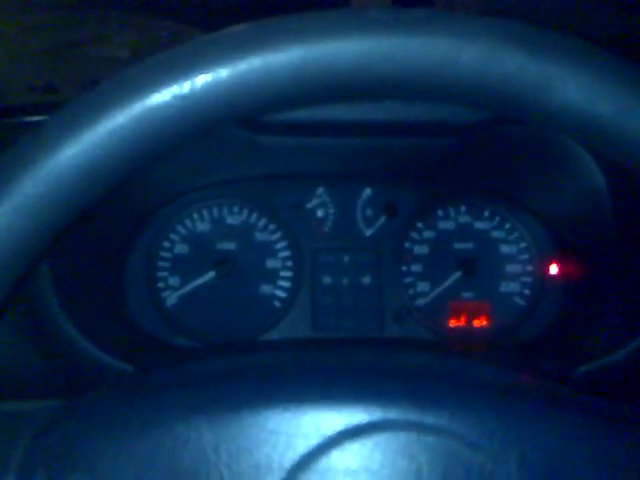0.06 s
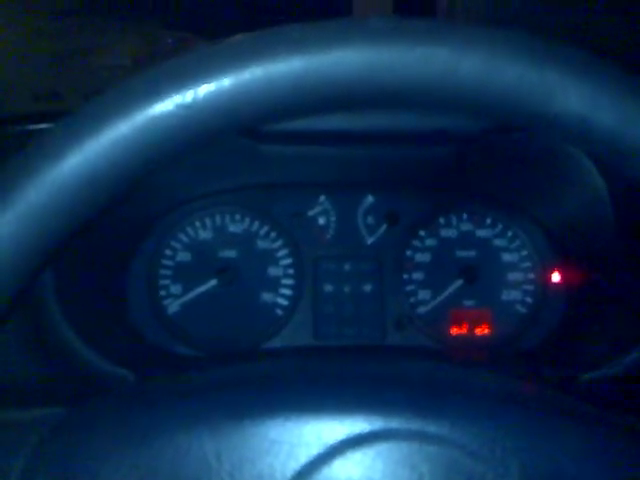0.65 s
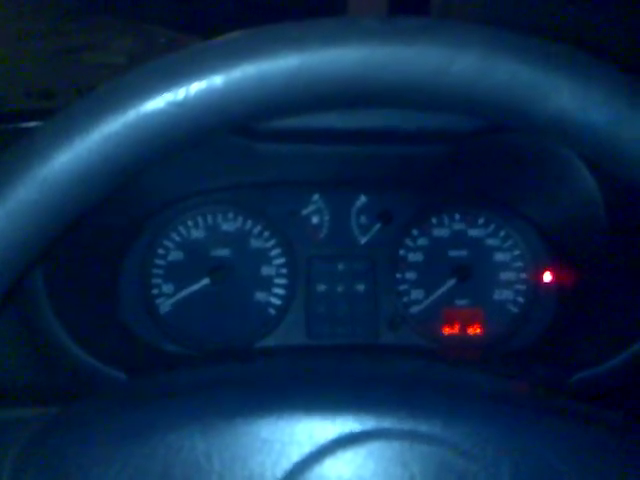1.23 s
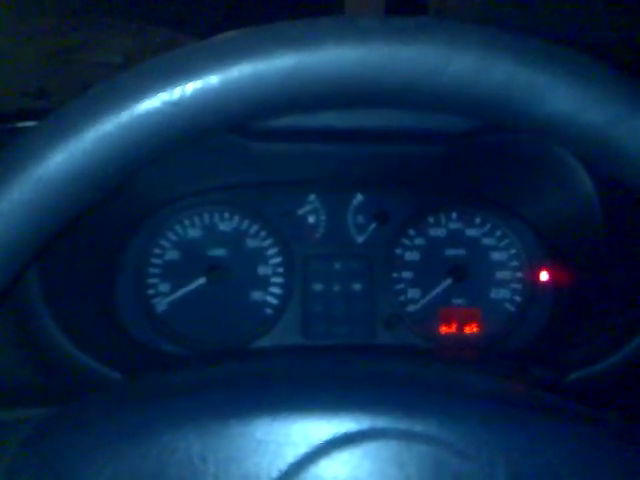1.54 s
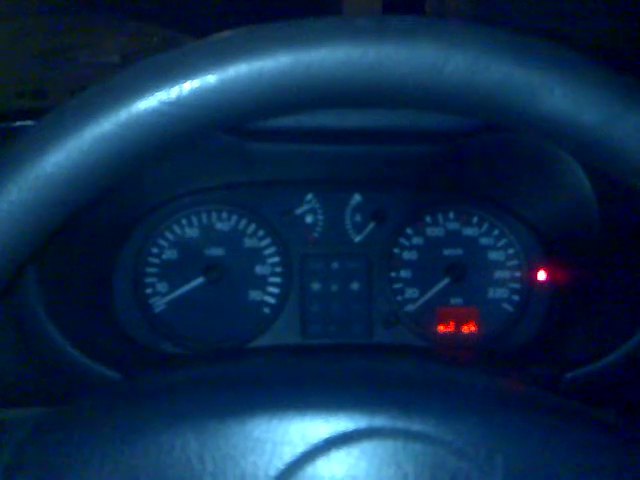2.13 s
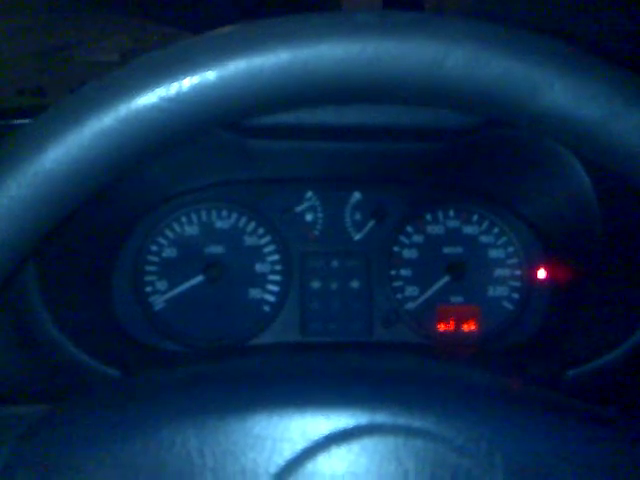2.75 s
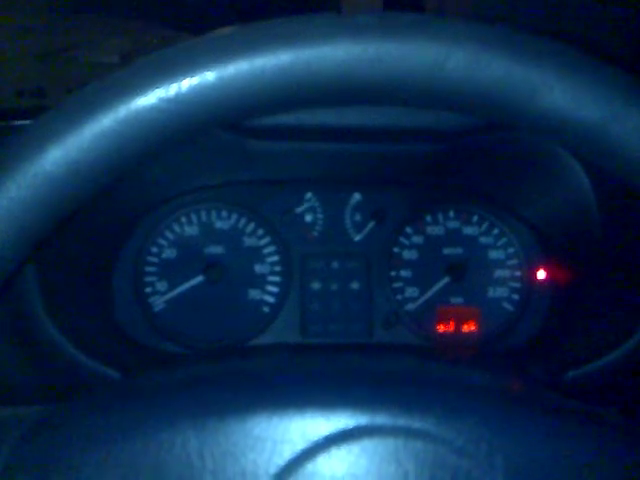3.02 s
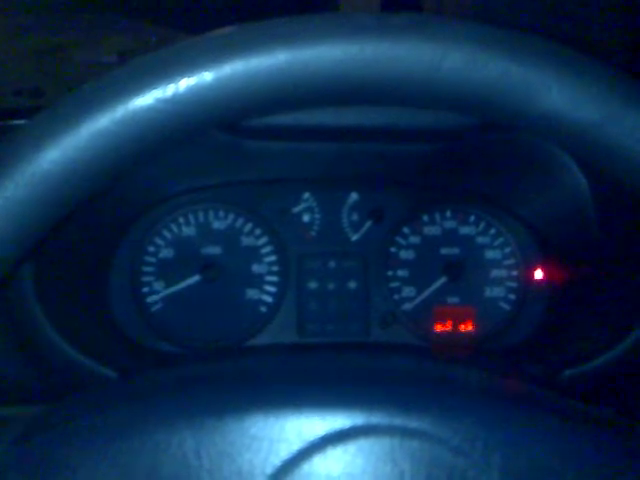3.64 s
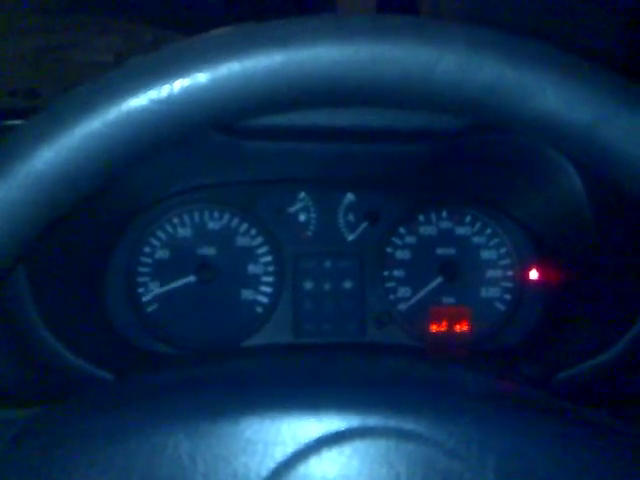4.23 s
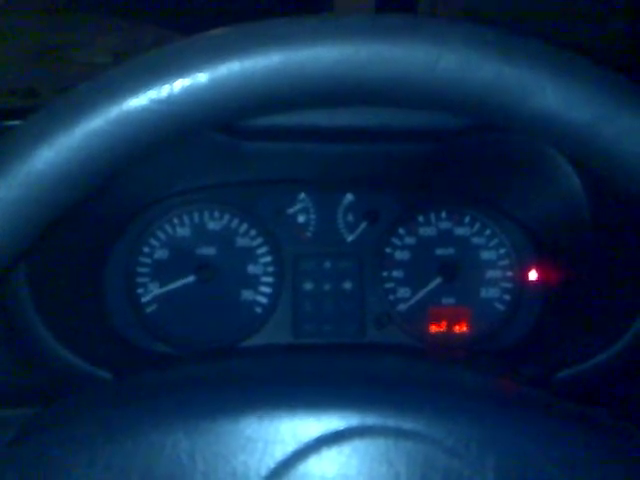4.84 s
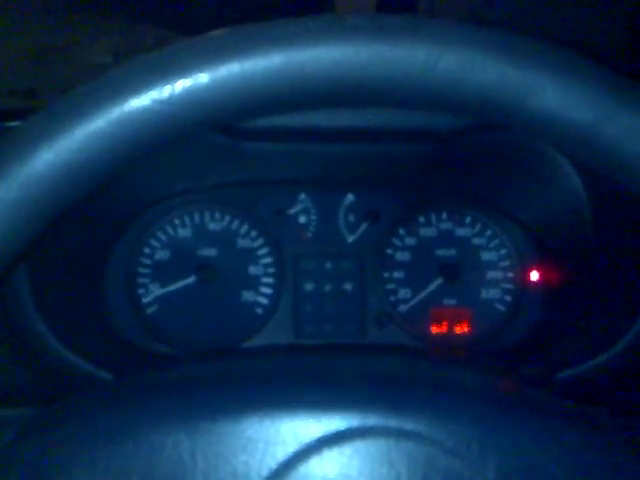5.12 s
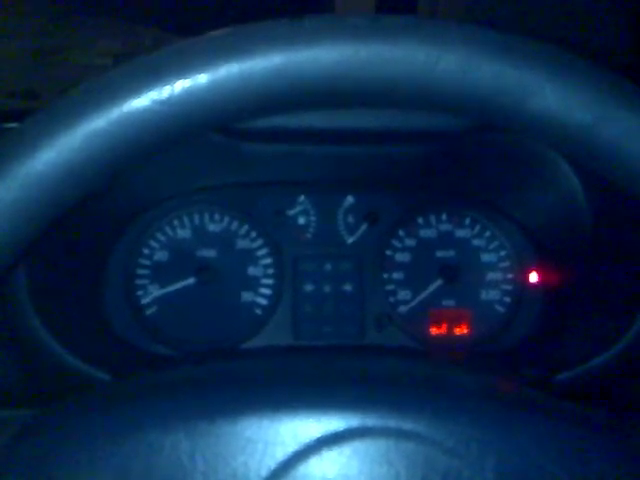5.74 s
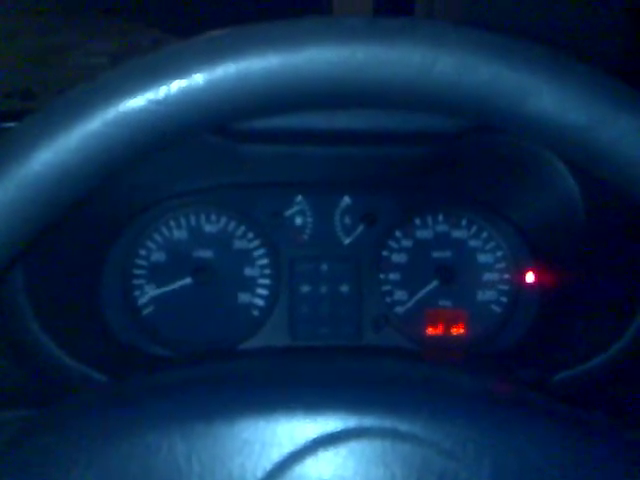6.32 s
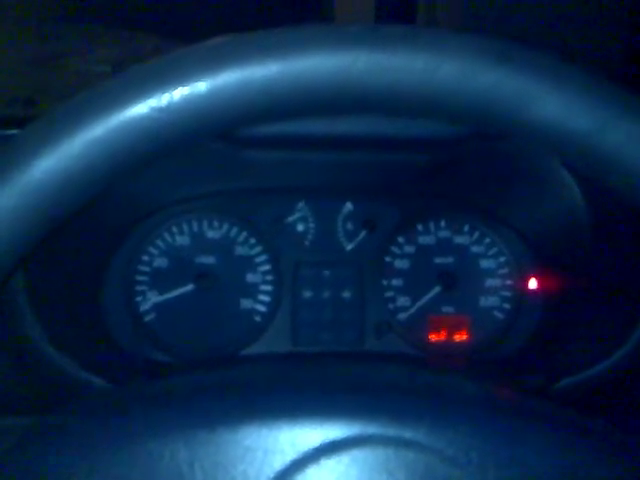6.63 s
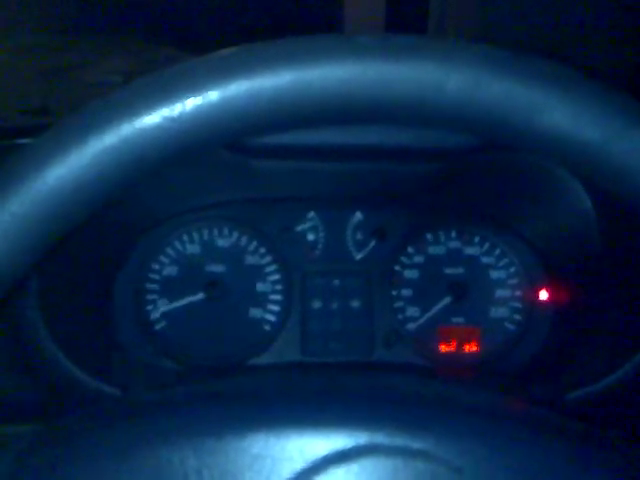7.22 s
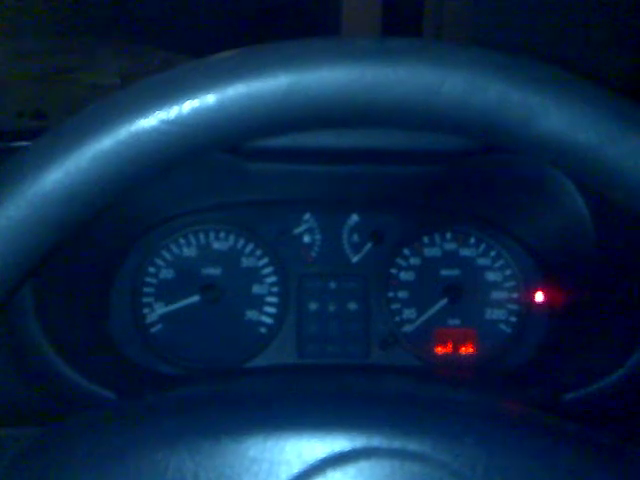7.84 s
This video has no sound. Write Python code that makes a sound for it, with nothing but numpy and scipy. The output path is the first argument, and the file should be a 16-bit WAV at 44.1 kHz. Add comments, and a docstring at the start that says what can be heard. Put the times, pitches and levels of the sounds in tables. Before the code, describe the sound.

Heard from the driver's seat of a closed car, a small cold diesel engine labours at very low speed with heavy, uneven thumps and muffled knocking. After about three seconds it picks up, wavers, and settles into a quieter, smoother idle that booms in the cabin, with faint valve ticking underneath. Near the end, a piece of plastic close to the microphone gives three quick, sharp clicks while the engine keeps running.

```python
"""Driver's seat of a closed car, just after the cold start of its small four-cylinder diesel.
The engine labours at very low speed, each firing a thump in the cabin, then picks up, hunts and settles
into an idle that booms in the cabin air. Combustion knock, piston slap and valve clatter come dully
through the bulkhead. Near the end some plastic close by clicks three times."""
import sys
import numpy as np
from scipy import signal
from scipy.fft import rfft, irfft, next_fast_len
from scipy.io import wavfile
from scipy.ndimage import uniform_filter1d

SR = 44100
rng = np.random.default_rng(int(sys.argv[2]) if len(sys.argv) > 2 else 0)


def transcribe(u):
    """Save the signal u as a 16-bit wav file named by the first command-line argument.

    u: samples, shape (n,) or (channels, n), limited to [-1, 1]; the rate is SR.
    q: integer samples, one column per channel.
    """
    v = np.clip(np.atleast_2d(u).T, -1, 1)
    q = np.round(v * 32767).astype(np.int16)
    wavfile.write(sys.argv[1], SR, q)


N = 355887
TIME = np.arange(N) / SR
FREQ = np.fft.rfftfreq(2 * next_fast_len(N // 2 + SR // 8), 1 / SR) + 1e-3
FIRINGS_PER_CYCLE = 4


def undb(db):
    """Decibels to gain."""
    return 10 ** (np.asarray(db) / 20)


def unit(x):
    """Scale to rms 1."""
    return x / np.sqrt(np.mean(x ** 2))


def noise():
    """White noise."""
    return rng.standard_normal(N)


def through(x, response):
    """Filter by a frequency response."""
    return irfft(rfft(x, 2 * len(FREQ) - 2) * response)[:N]


def resonance(hz, width_hz):
    """Response of one damped resonance, 1 at its centre."""
    return 1 / (1 + 1j * (FREQ ** 2 - hz ** 2) / (FREQ * width_hz))


def swept(drive_hz, hz, width_hz):
    """Response of a resonance to a moving drive frequency, 1 at its centre."""
    return 1 / (1 + 2j * (drive_hz - hz) / width_hz)


def modes(table):
    """Response of a body with several resonances."""
    return sum(undb(db) * resonance(hz, width_hz) for hz, width_hz, db in table)


def colour(points):
    """Minimum-phase response with the given (Hz, dB) outline."""
    hz, db = np.transpose(points)
    gain = undb(np.interp(np.log(FREQ), np.log(hz), db))
    cepstrum = irfft(np.log(gain))
    cepstrum[1:len(FREQ) - 1] *= 2
    cepstrum[len(FREQ):] = 0
    return np.exp(rfft(cepstrum))


def pulses(times_s, sizes):
    """One impulse at each time."""
    at = np.round(np.asarray(times_s) * SR).astype(int)
    inside = (at >= 0) & (at < N)
    return np.bincount(at[inside], np.asarray(sizes)[inside], N)


def fading(blows, decay_s):
    """Envelope that jumps at each blow and dies away."""
    return signal.lfilter([1], [1, -np.exp(-1 / (decay_s * SR))], blows)


def settling(labouring_db, idle_db, halfway_s, easing_s):
    """Level in dB, easing from labouring to idle."""
    return idle_db + (labouring_db - idle_db) / (1 + np.exp((TIME - halfway_s) / easing_s))


def swell(centre_s, half_length_s, db):
    """Bell-shaped level change in dB."""
    return db * np.exp(-((TIME - centre_s) / half_length_s) ** 2)


# Engine speed. Each row: time in seconds, firing rate in Hz.
ENGINE_SPEED = [(0.0, 18.11), (0.48, 18.55), (1.61, 18.79), (2.75, 19.29), (3.34, 21.15), (3.97, 26.9),
                (4.28, 26.68), (4.67, 24.01), (5.11, 26.27), (5.6, 25.89), (6.28, 26.07), (6.85, 25.79),
                (7.4, 26.87), (8.07, 25.47)]
# One strain before the pick-up, two light spells after it.
# Each row: centre in seconds, half-length in seconds, level change in dB.
LOAD_SWELLS = [(2.334, 0.17, 2), (4.619, 0.21, -1), (7.398, .25, -3.5)]


def crankshaft():
    """Crank angle counted in firings, firing rate and load."""
    rate_hz = np.interp(TIME, *np.transpose(ENGINE_SPEED))
    crank = np.cumsum(rate_hz) / SR - .42
    load_db = sum(swell(*change) for change in LOAD_SWELLS)
    return crank, rate_hz, load_db


# Cylinders in firing order. Each row: knock, valve tick, thud, panel shudder, injector and tappet
# strength, all in relative dB.
CYLINDER_STRENGTHS = [(0, -3, -7, -8, 0.5, -2), (-1, -4, -3, 4.5, 5, -10), (-2, -2.5, -4, -14, -5, 4),
                      (2.5, 2.5, -5, -8.5, -1, -4)]
KNOCK_DB, VALVE_DB, THUD_DB, SHUDDER_DB, INJECTOR_DB, TAPPET_DB = np.transpose(CYLINDER_STRENGTHS)


def strokes(crank, lag, cylinder_db, scatter_db, jitter_s):
    """One impulse per firing, offset by lag firings; strength is common or per cylinder."""
    firing = np.arange(-1, int(crank[-1]) + 1)
    late, harder = rng.standard_normal((len(firing), 2)).T
    times_s = np.interp(firing + lag, crank, TIME, left=-1, right=-1) + jitter_s * late
    strength_db = np.broadcast_to(cylinder_db, FIRINGS_PER_CYCLE)[firing % FIRINGS_PER_CYCLE]
    return pulses(times_s, undb(strength_db + scatter_db * harder))


def fizz(crank, thump_db, trim_db=-62.5):
    """A faint, dull fizz rides on the crest of each thump."""
    crests = strokes(crank, lag=.4, cylinder_db=0, scatter_db=2, jitter_s=.001)
    bursts = noise() * fading(crests, decay_s=.008)
    return unit(through(bursts, resonance(hz=2600, width_hz=2200) ** 3)) * undb(thump_db + trim_db)


def injectors(crank, level_db=-90.8):
    """Injectors tick on opening and closing, whatever the load; one is louder than the rest."""
    opening = strokes(crank, lag=.08, cylinder_db=INJECTOR_DB, scatter_db=1.5, jitter_s=.0006)
    closing = strokes(crank, lag=.28, cylinder_db=-3, scatter_db=3, jitter_s=.001)
    bursts = noise() * (.28 + fading(opening + closing, decay_s=.004))
    return unit(through(bursts, resonance(hz=1950, width_hz=600) ** 4)) * undb(level_db)


def tappets(crank, knock_over_idle_db, idle_db=-86):
    """Tappets tap; a loose one clacks every four firings, a little harder under load."""
    taps = strokes(crank, lag=-.01, cylinder_db=TAPPET_DB, scatter_db=1, jitter_s=.0005)
    bursts = noise() * fading(taps, decay_s=.007)
    level_db = idle_db + .4 * knock_over_idle_db
    return unit(through(bursts, resonance(hz=1240, width_hz=700) ** 4)) * undb(level_db)


# Contacts, a few per click. Each row: start in seconds, relative level in dB, centre in Hz, width in Hz.
PLASTIC_CONTACTS = [(6.9209, 4, 294, 1100), (6.9207, 0, 1000, 970), (6.9208, 4, 1500, 800),
                    (6.9206, -6, 3560, 1100), (6.9209, -17, 5000, 4400), (6.9335, -20, 800, 1100),
                    (6.9721, -15.5, 5190, 2700), (6.9720, -18, 2100, 1600), (6.9707, -10, 360, 430),
                    (6.9969, -1, 2020, 1400), (6.9972, -8, 5000, 4900), (6.9962, -4, 470, 450),
                    (7.0658, -4, 2940, 2430), (7.0660, -8, 9700, 6000), (7.0652, -15, 580, 2600)]
# Plastic resonances. Each row: centre in Hz, width in Hz, gain in dB.
PLASTIC_MODES = [(390, 504, 8.5), (635, 60, -1), (965, 69, -6), (1084, 348, -11), (1600, 163, -4.5),
                 (2256, 276, -9.5), (3050, 330, -7.5), (3468, 220, -10), (5000, 900, -14), (6850, 260, -8),
                 (9070, 670, -16)]


def plastic_clicks(travel_at_1khz_s=.0015, scrape_db=-49, tail_db=-48, tail_decay_s=.014):
    """Plastic snaps, slips and snaps again; its bending waves bring treble first, bass last."""
    blows = sum(through(pulses([start_s], [undb(db)]), resonance(hz, width_hz) ** 4)
                for start_s, db, hz, width_hz in PLASTIC_CONTACTS)
    slip_times_s = [6.92, 6.925, 6.969, 6.974, 6.988, 6.996, 7.001, 7.02]
    slipping = np.interp(TIME, slip_times_s, [0, .25, .2, .9, .6, 1.4, .2, 0])
    catches = noise() * rng.exponential(size=N) ** 2 / 5
    scrape = through(catches * slipping, resonance(hz=5200, width_hz=6000) ** 2)
    bending = np.exp(-4j * np.pi * travel_at_1khz_s * np.sqrt(1000 * FREQ))
    direct = through(blows + undb(scrape_db) * scrape, modes(PLASTIC_MODES) * bending)
    # upholstery leaves only a short, faint tail
    tail_s = TIME[:SR // 10]
    tail = uniform_filter1d(noise()[:len(tail_s)], size=5) * np.exp(-tail_s / tail_decay_s)
    return direct + undb(tail_db) * signal.fftconvolve(direct, tail)[:N]


# Knock spectrum through the bulkhead. Each row: frequency in Hz, relative density in dB.
KNOCK_SPECTRUM = [(400, -15), (830, -15.5), (880, 4.5), (980, 3.5), (1050, -8.5), (1130, -12.5),
                  (1300, -11.5), (1500, -18), (1750, -22), (2050, -33), (2300, -40.5), (3200, -49.5),
                  (6000, -58.5), (9000, -66)]


def diesel_knock(crank, knock_db, clatter_db=-2.5, ring_db=-5):
    """A knock at each ignition, then a valve tick: each a short ring of the block in a burst of clatter."""
    ignitions = strokes(crank, lag=-.08, cylinder_db=KNOCK_DB, scatter_db=1.2, jitter_s=.0007)
    valves = strokes(crank, lag=.22, cylinder_db=VALVE_DB - 1, scatter_db=1.9, jitter_s=.0014)
    blows = ignitions + valves * undb(settling(0, -8.5, halfway_s=3.3, easing_s=.7))
    # mounts and bulkhead round each onset
    envelope = uniform_filter1d(.24 + fading(blows, decay_s=.0065), size=90)
    clatter = unit(through(noise() * envelope, colour(KNOCK_SPECTRUM)))
    ring = unit(through(blows, resonance(hz=955, width_hz=130) ** 2))
    return (undb(clatter_db) * clatter + undb(ring_db) * ring) * undb(knock_db)


# Hard firings. Each row: time in seconds, relative level in dB, decay in seconds, relative edge in dB.
HARD_FIRINGS = [(0.041, -56, .004, -6), (0.181, -54.5, 0.0033, -18.5), (0.200, -58, .004, -13.5),
                (0.293, -54, .005, -19), (0.351, -52.5, 0.0088, -3), (0.372, -57, 0.0048, -4),
                (0.401, -51, 0.0072, -6.5), (0.416, -54, 0.012, -8), (0.458, -57.5, 0.0047, 1),
                (0.568, -56.5, .006, -0.5), (0.617, -57.5, 0.0034, -9), (0.78, -54.5, .005, -2),
                (0.832, -57.5, .005, -9.5), (0.94, -56, .004, -16), (0.997, -53, .005, -3),
                (1.014, -58, 0.0044, -4), (1.209, -52, 0.0074, -3), (1.229, -52.5, .007, -6),
                (1.260, -55.5, 0.0044, -11.5), (1.441, -57, 0.0034, -8), (1.472, -54.5, .005, -8.5),
                (1.582, -54.5, .004, -20), (1.743, -57, 0.0074, -1), (1.794, -57.5, .005, -5.5),
                (1.896, -52.5, .006, -14), (1.920, -53, 0.0047, -9.5), (1.956, -50.5, 0.0087, -2),
                (1.975, -57, 0.014, -4), (2.109, -53.5, 0.0044, -10), (2.169, -57.5, .004, -9),
                (2.318, -47, .008, -13.5), (2.336, -49, .010, -8.5), (2.376, -53, .010, -2),
                (2.687, -55, .005, -0.5), (2.855, -59.5, 0.0039, -7), (3.037, -51.5, 0.0054, -16),
                (3.136, -51, .005, -5), (3.154, -53.5, 0.0054, -8), (3.195, -56, 0.0053, -21),
                (3.297, -61, 0.0042, -7), (3.329, -58, 0.0047, -3), (3.394, -62, .004, -8),
                (3.472, -62, 0.0045, -2), (3.684, -57.5, .007, -7), (3.963, -61, 0.0076, -2.5),
                (4.106, -58.5, .005, -7), (4.141, -55.5, 0.0049, -9), (4.739, -59, 0.0043, -8),
                (5.240, -62.5, .005, -23), (5.316, -60, .006, -20)]


def hard_knocks(trim_db=-1, bright_db=-9, lead_s=.001):
    """A cold cylinder sometimes fires harder: a crisp clack, often doubled, some with a metallic edge."""
    dull = bright = clacks = 0
    for time_s, db, decay_s, edge_db in HARD_FIRINGS:
        burst = fading(pulses([time_s - lead_s], [undb(db)]), decay_s)
        dull += burst
        bright += burst * undb(edge_db + bright_db)
    metallic = resonance(hz=1330, width_hz=750) ** 4
    for envelope, path in [(dull, colour(KNOCK_SPECTRUM)), (bright, metallic)]:
        path_rms = np.sqrt(np.mean(abs(path) ** 2))
        clacks += through(noise() * uniform_filter1d(envelope, size=70), path / path_rms)
    return undb(trim_db) * clacks


# Slaps in one four-stroke cycle. Each row: position in firings, relative level in dB, ring in Hz.
PISTON_SLAPS = [(.04, -5.5, 561), (1.3, -1, 570), (1.52, -1.5, 430), (2.33, -1, 560), (2.98, 0, 440)]


def piston_slap(crank, block_db, trim_db=-7, jitter_s=.0007, scatter_db=1.2):
    """Cold pistons slap at set points of the cycle, each ringing the block with its own hollow note."""
    cycle_starts = FIRINGS_PER_CYCLE * np.arange(crank[-1] // FIRINGS_PER_CYCLE + 1)
    block_band = resonance(hz=520, width_hz=430) ** 4
    ring = 0
    for position, db, hz in PISTON_SLAPS:
        late, harder = rng.standard_normal((len(cycle_starts), 2)).T
        times_s = np.interp(cycle_starts + position, crank, TIME, left=-1, right=-1) + jitter_s * late
        slaps = pulses(times_s, undb(db + scatter_db * harder))
        ring += through(slaps, resonance(hz, width_hz=130) * block_band)
    return unit(ring) * undb(block_db + trim_db)


# Dashboard panel resonances. Each row: centre in Hz, width in Hz, gain in dB.
PANEL_MODES = [(233, 18, 7.5), (266, 47, -1)]


def panel_shudder(crank, block_db, trim_db=-26.3):
    """One cylinder shakes a panel hardest, and it rebounds: a loose throb every four firings."""
    blows = strokes(crank, lag=.2, cylinder_db=SHUDDER_DB, scatter_db=2, jitter_s=.0005)
    rebounds = strokes(crank, lag=.78, cylinder_db=SHUDDER_DB - 5, scatter_db=2.5, jitter_s=.002)
    panel = modes(PANEL_MODES) * resonance(hz=238, width_hz=100) ** 2
    return unit(through(blows + rebounds, panel)) * undb(.5 * block_db + trim_db)


# Block spectrum through the bulkhead. Each row: frequency in Hz, relative density in dB.
BLOCK_SPECTRUM = [(40, 6), (70, 14.5), (120, 14.5), (200, 3.5), (300, 0.5), (400, 0), (470, -0.5),
                  (510, -4), (560, 0.5), (620, -6.5), (700, -9), (810, -18.5), (1100, -29.5), (2200, -61.5)]


def block_rumble(crank, block_db, trim_db=10):
    """The block thuds after each ignition over a churn that partly repeats every four firings."""
    mean_rate_hz = np.mean([hz for _, hz in ENGINE_SPEED])
    cycle_samples = int(FIRINGS_PER_CYCLE * SR / mean_rate_hz)
    cycle_phase = crank / FIRINGS_PER_CYCLE % 1
    repeating = np.interp(cycle_phase * cycle_samples, np.arange(cycle_samples), noise()[:cycle_samples])
    thuds = strokes(crank, lag=.33, cylinder_db=THUD_DB, scatter_db=2, jitter_s=.001)
    churn = .55 * repeating + .7 * noise()
    envelope = .65 + fading(thuds, decay_s=.007)
    return unit(through(churn * envelope, colour(BLOCK_SPECTRUM))) * undb(block_db + trim_db)


# Standing waves in the cabin air. Each row: centre in Hz, width in Hz, gain in dB.
AIR_MODES = [(78.2, 9, -10), (103.2, 8, -13), (128.97, 13, 0), (154.7, 11, -10), (183.6, 12, -26)]
# Boom swells as the engine hunts. Each row: centre in seconds, half-length in seconds, change in dB.
HUNTING_SWELLS = [(3.247, .2, 1.5), (3.838, .07, 2.5), (4.335, 0.075, 2.5), (4.526, .06, -5),
                  (4.762, .13, 5), (7.719, .1, 1.5)]


def cabin_boom(crank, rate_hz, load_db, lag=.11, waver=.2):
    """Cabin air booms on the engine orders that sweep past its standing waves; each wavers on its own."""
    drone = 0
    for order in range(3, 9):
        response = sum(undb(db) * abs(swept(order * rate_hz, hz, width_hz)) ** 2
                       for hz, width_hz, db in AIR_MODES)
        unsteady = 1 + waver * unit(through(noise(), resonance(hz=10, width_hz=25) ** 2))
        # the cabin delays each order differently, softening the flutter of the firings
        turns = order * (crank - lag) - .1 * (order - 5) ** 2
        drone += response * unsteady * np.cos(2 * np.pi * turns)
    hunting_db = sum(swell(*change) for change in HUNTING_SWELLS)
    level_db = settling(-55, -44.5, halfway_s=2.8, easing_s=.2) + load_db + hunting_db
    return np.sqrt(2) * drone * undb(level_db)


def mount_shake(crank, rate_hz, load_db, mount_hz=27.02, mount_db=-25.5):
    """The engine rocks on its rubber mounts, most near resonance; the body sways at twice that rate."""
    mounts = undb(mount_db) * swept(rate_hz, mount_hz, width_hz=3.3)
    rocking = np.real(mounts * np.exp(2j * np.pi * (crank - .38)))
    pick_up_db = swell(centre_s=3.55, half_length_s=.17, db=9.2)
    sway_db = settling(-35, -46, halfway_s=2.5, easing_s=.14) + load_db + pick_up_db
    sway = undb(sway_db) * np.cos(2 * np.pi * 2 * (crank - .41))
    return np.sqrt(2) * (rocking + sway)


# Cabin resonances. Each row: centre in Hz, width in Hz, gain in dB.
CABIN_MODES = [(58.9, 12, 2), (80, 22, -1.5), (95.1, 9.9, -1.5), (110.54, 5.1, 3), (152.1, 7, -5),
               (164.7, 4.3, -1.5)]


def firing_thumps(crank, thump_db, trim_db=3, muffle_hz=197):
    """Each firing jolts the cabin, which rings briefly; the rubber mounts pass no treble."""
    jolts = strokes(crank, lag=.44, cylinder_db=0, scatter_db=.3, jitter_s=.0002)
    muffle = 1 / (1 + (FREQ / muffle_hz) ** 18)
    return unit(through(jolts, modes(CABIN_MODES) * muffle)) * undb(thump_db + trim_db)


def scene(idle_hz=26, speed_db_per_hz=.8151, idle_knock_db=-73.4):
    """One crankshaft drives the repeating engine sounds; hard knocks fall at their own listed times."""
    crank, rate_hz, load_db = crankshaft()
    effort_db = load_db + speed_db_per_hz * (rate_hz - idle_hz)
    knock_db = settling(-60, idle_knock_db, halfway_s=3.3, easing_s=.28) + effort_db
    block_db = settling(-47.5, -62.5, halfway_s=3.5, easing_s=.37) + effort_db
    thump_db = settling(-37.6, -56, halfway_s=3.13, easing_s=.16)
    ticking = injectors(crank) + tappets(crank, knock_db - idle_knock_db)
    knocking = diesel_knock(crank, knock_db) + hard_knocks()
    block = piston_slap(crank, block_db) + panel_shudder(crank, block_db) + block_rumble(crank, block_db)
    drone = cabin_boom(crank, rate_hz, load_db) + mount_shake(crank, rate_hz, load_db)
    thumping = fizz(crank, thump_db) + firing_thumps(crank, thump_db)
    return (ticking + plastic_clicks() + knocking + block + drone + thumping)[None]


def record(dry, hiss_db=-94, top_hz=17100):
    """Faint hiss and a steep cut of the top treble."""
    lowpass = signal.ellip(8, .2, 70, top_hz, fs=SR, output="sos")
    return signal.sosfilt(lowpass, dry + undb(hiss_db) * noise())


dry = scene()
out = record(dry)
transcribe(out)
```